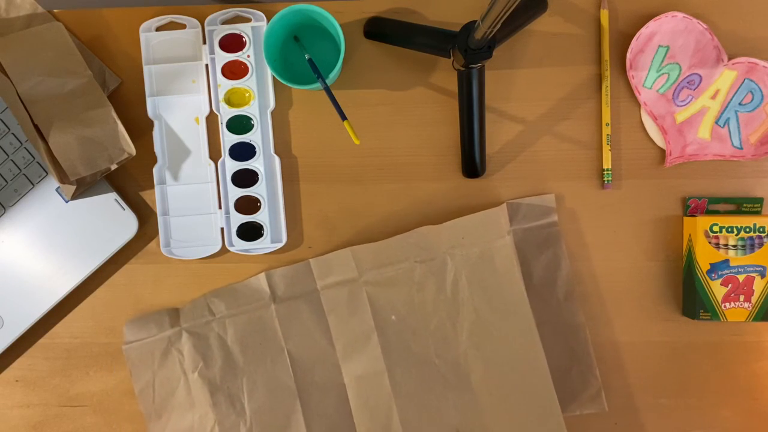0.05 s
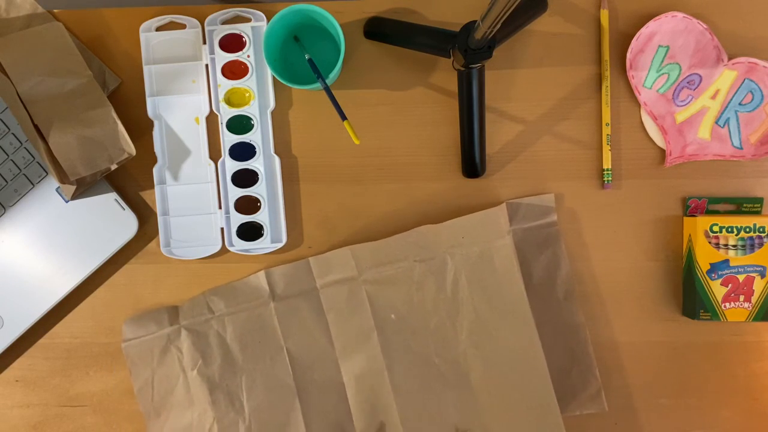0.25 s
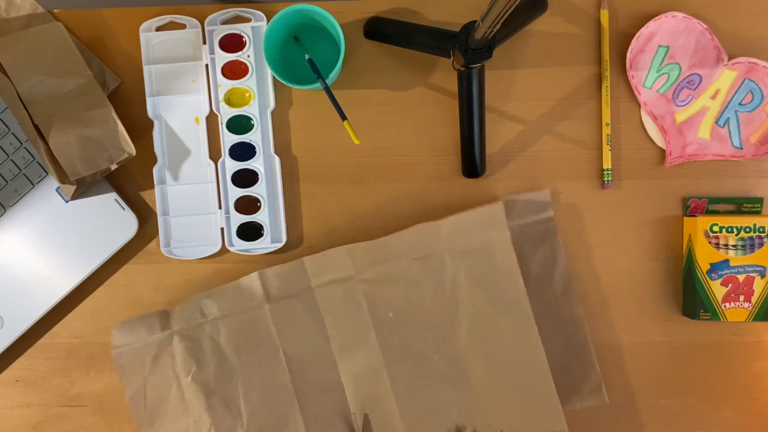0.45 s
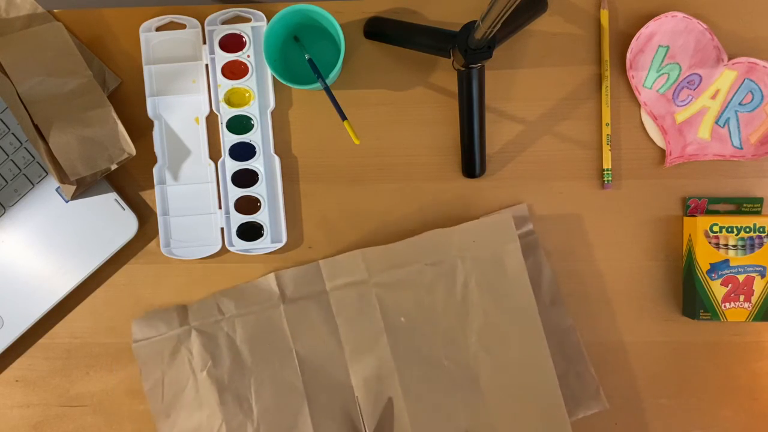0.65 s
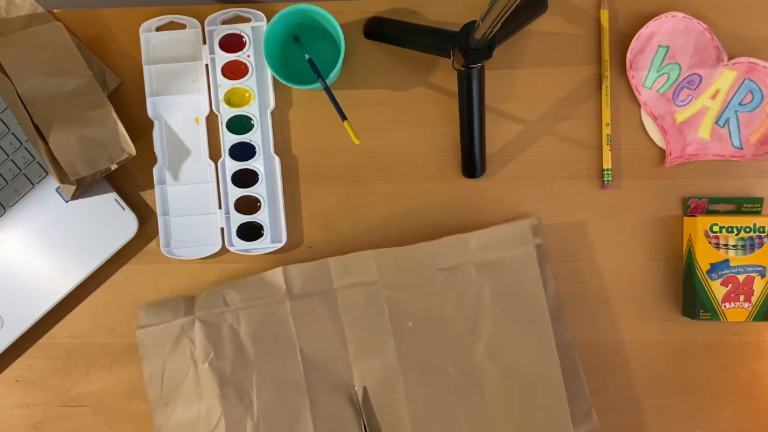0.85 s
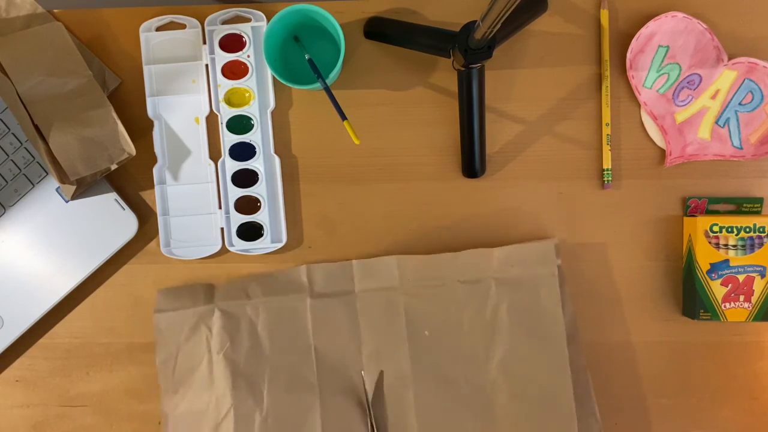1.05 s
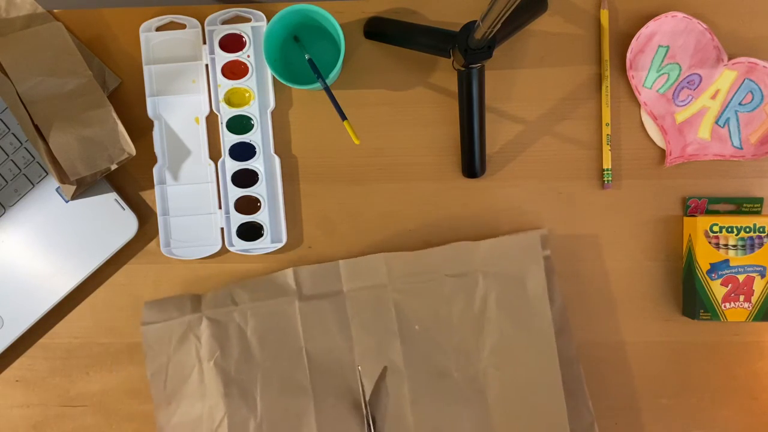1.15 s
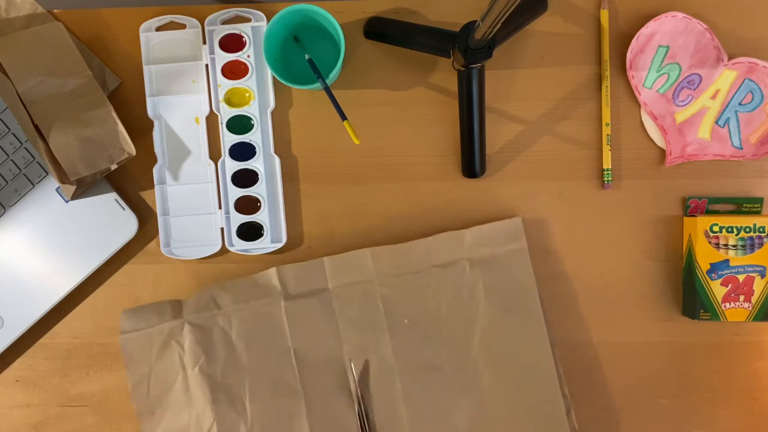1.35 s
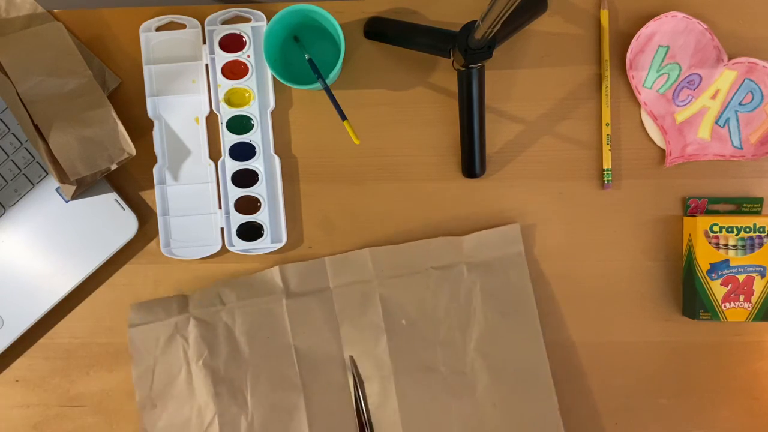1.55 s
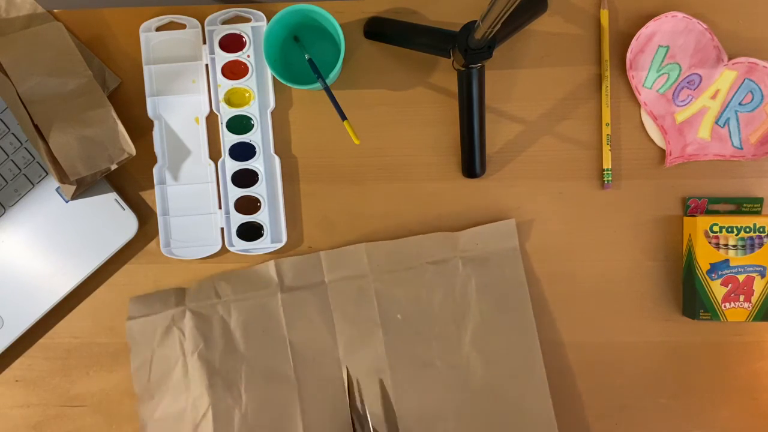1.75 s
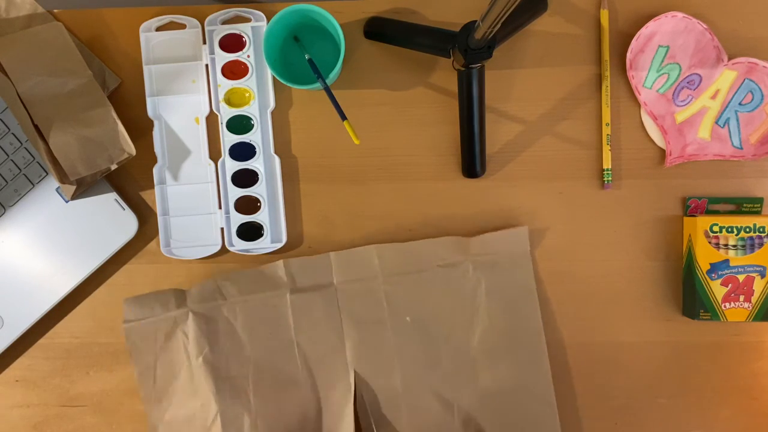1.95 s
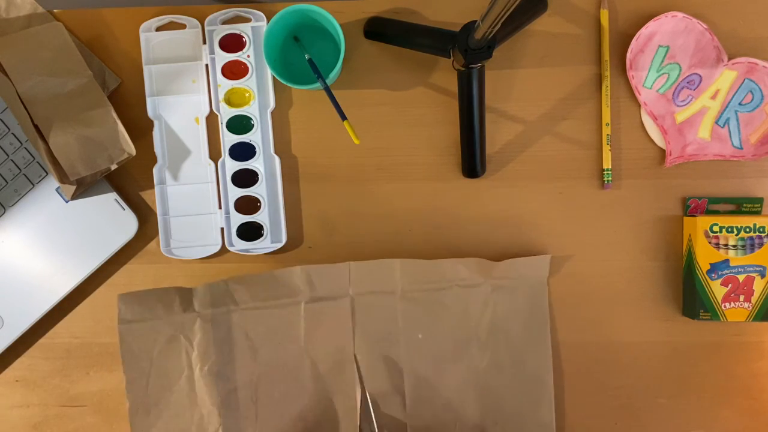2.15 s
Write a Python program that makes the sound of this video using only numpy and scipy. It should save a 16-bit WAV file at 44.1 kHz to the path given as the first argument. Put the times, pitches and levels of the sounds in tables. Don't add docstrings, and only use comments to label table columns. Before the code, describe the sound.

Scissors cutting a paper bag in several crunchy strokes, with crisp snaps, rustling and soft table thumps.

```python
import sys
import numpy as np
from scipy import signal
from scipy.fft import rfft, irfft, next_fast_len
from scipy.io import wavfile
from scipy.ndimage import map_coordinates

SR = 44100
rng = np.random.default_rng(int(sys.argv[2]) if len(sys.argv) > 2 else 0)


def persist_wave(psi):
    counts = np.round(np.clip(psi, -1, 1) * 32767).astype(np.int16)
    wavfile.write(sys.argv[1], SR, np.atleast_2d(counts).T)


def volts_from_db(level):
    exponent = np.asarray(level, float) / 20
    return 10 ** exponent


N = 97020
T = np.arange(N) / SR


def unit(x):
    return x / np.sqrt(np.mean(x ** 2) + 1e-20)


def along(points, hz):
    f, v = np.transpose(points)
    return np.interp(np.log(hz + 1), np.log(f + 1), v)


def curve(rows, axis):
    rows = np.array(rows)
    return np.interp(T, rows[:, 0], rows[:, axis])


def wobble(rate):
    knots = rng.standard_normal(int(N * rate / SR) + 4)
    return map_coordinates(knots, [T * rate])


def filtered(x, response):
    m = next_fast_len(N + SR // 2)
    hz = np.fft.rfftfreq(m, 1 / SR)
    return irfft(rfft(x, m) * response(hz), m)[..., :N]


# frequency_hz, level_db
HUM_SPECTRUM = [(22, -39), (56, 3), (80, -8.5), (130, -7), (180, -37.5)]
# time_s, level_db
HANDLING = [(0, -85.5), (.25, -72), (.44, -77), (.52, -57.5), (.67, -63.5), (.74, -67.5), (.95, -57),
            (1.16, -75), (1.4, -66.5), (1.57, -71), (1.62, -59.5), (1.8, -66), (1.88, -56.5), (2.0, -78),
            (2.2, -70.5)]


def hum():
    a, b = filtered(rng.standard_normal((2, N)), lambda hz: volts_from_db(along(HUM_SPECTRUM, hz)))
    pair = unit(np.array([a + 0.087 * b, a - 0.46 * b]))
    swell_db = curve(HANDLING, axis=1)
    level_db = -65 + 0.24 * (swell_db - swell_db.mean()) + 1.0 * wobble(12.0)
    hiss = volts_from_db(-92) * rng.standard_normal((2, N))
    return volts_from_db(level_db) * pair + hiss


# frequency_hz, level_db
RUMBLE_SPECTRUM = [(100, -30), (150, -5.5), (260, 0.5), (380, -0.5), (520, -5.5), (700, -14), (1000, -21.5)]
# start_s, level_db, pitch_hz
THUMPS = [(0.443, -48.5, 111), (1.613, -50, 278), (1.846, -35.5, 294), (1.875, -38, 516),
          (1.881, -37.5, 117), (1.95, -51.5, 111), (2.165, -39.5, 626), (1.858, -47, 200),
          (0.518, -47, 337), (0.658, -52, 305), (2.093, -43, 257)]


def table():
    rumble = unit(filtered(rng.standard_normal(N), lambda hz: volts_from_db(along(RUMBLE_SPECTRUM, hz))))
    out = rumble * volts_from_db(curve(HANDLING, axis=1) + 3.5 + 3.86 * wobble(29.81))
    for start_s, level_db, pitch_hz in THUMPS:
        t = np.maximum(T - start_s, 0)
        t60_s = 9 / pitch_hz
        onset = 1 - np.exp(-t / 0.00096)
        out = out + volts_from_db(level_db - 60 * t / t60_s) * onset * np.sin(2 * np.pi * pitch_hz * t)
    return out


def tearing(spiky_db, clump_db):
    size_db = spiky_db * rng.exponential(1, N) + clump_db * (wobble(400) + 0.18 * wobble(90))
    return unit(rng.standard_normal(N) * volts_from_db(size_db))


# time_s, level_db, brightness_db
SLIDE = [(0, -81, -13), (.1, -78, -12), (.115, -70, -3), (.42, -54.5, -13), (.72, -61.5, -3),
         (.9, -52, -10), (1.1, -52.5, -2), (1.21, -54, -4), (1.25, -65, -1), (1.56, -53, 3.5),
         (1.7, -50.5, -3), (1.82, -57, -4.5), (1.9, -48.5, -18), (1.97, -55, -1.5), (2.03, -51, 4.5),
         (2.12, -54.5, -3), (2.2, -57, 6)]
# frequency_hz, level_db
DRAG_SPECTRUM = [(180, -31), (680, -19), (950, 0), (1340, 4.5), (3190, -1), (7570, -6), (10600, -4.5),
                 (13800, -18), (16000, 2)]
# frequency_hz, level_db
GLIDE_SPECTRUM = [(3000, -41), (5000, -5), (7800, 3.5), (10000, -2), (13000, -1), (16000, -2.5)]


def slide():
    drag = filtered(tearing(spiky_db=2.0, clump_db=1.06), lambda hz: volts_from_db(along(DRAG_SPECTRUM, hz)))
    glide = filtered(tearing(spiky_db=1.5, clump_db=-0.2), lambda hz: volts_from_db(along(GLIDE_SPECTRUM, hz)))
    level_db = curve(SLIDE, axis=1)
    drag_db = level_db + 0.5 + 3.2 * wobble(25.44)
    glide_db = level_db + curve(SLIDE, axis=2) - 4.5 + 0.96 * wobble(7.5)
    return unit(drag) * volts_from_db(drag_db) + unit(glide) * volts_from_db(glide_db)


def hollow():
    start_s, level_db, pitch_hz, width_hz, t60_s = 1.6, -50.5, 770, 200, 0.76

    def cavity(f):
        return (1j * f * width_hz / (pitch_hz ** 2 - f * f + 1j * f * width_hz)) ** 2

    t = np.maximum(T - start_s, 0)
    ring = filtered(tearing(spiky_db=1.5, clump_db=4.0), cavity)
    return unit(ring) * volts_from_db(level_db - 60 * t / t60_s) * (1 - np.exp(-t / 0.0057))


# start_s, level_db, pitch_hz
POPS = [(0.879, -28.5, 1170), (0.885, -29.5, 1340), (1.213, -37, 1270), (1.2596, -27, 1120),
        (1.298, -29, 1225), (1.613, -31, 1220), (1.84, -21, 1217), (1.874, -25.5, 1290),
        (1.884, -34.5, 1000), (2.016, -54, 2000), (2.043, -45, 2510), (2.097, -37.5, 1860),
        (1.184, -49, 1520), (1.627, -34, 3300), (1.068, -40, 2820), (2.086, -29.5, 1262),
        (2.164, -40, 1120), (0.5655, -26, 2330), (0.667, -25, 2620), (0.7085, -30, 2050),
        (1.3075, -22, 5150), (1.354, -22, 3350), (1.442, -35, 2520), (1.491, -28, 1510), (1.944, -33, 4700),
        (0.516, -39.5, 1020)]


def pops():
    cycles, late_s, echo_s, echo_db = 1.34, .001, .008, -9.5
    out = np.zeros(N)
    for start_s, level_db, pitch_hz in POPS:
        for delay_s, loss_db in [(0, 0), (echo_s, echo_db)]:
            u = np.maximum(T - start_s - delay_s - late_s, 0) * pitch_hz / cycles
            out += volts_from_db(level_db + loss_db - 3) * u * np.exp(1 - u) * np.sin(2 * np.pi * u * cycles)
    return out


# frequency_hz, width_hz, level_db
SHEET = [(1035, 286, -2), (1530, 564, -3.5), (2210, 448, 0), (2570, 506, -0.5), (3285, 2200, -12)]


def sheet(f, part):
    rise = (1j * f / 700 / (1 + 1j * f / 700)) ** 6
    total = 0
    for k, (centre_hz, width_hz, level_db) in enumerate(part):
        damping = 1j * f * width_hz
        mode = damping / (centre_hz * centre_hz - f * f + damping + 1e-9)
        total = total + (-1) ** k * volts_from_db(level_db) * mode
    return rise * total


# frequency_hz, level_db
FIZZ_SPECTRUM = [(2500, -21.5), (3500, -0.5), (6000, -1.5), (8300, 2), (13500, -1.5), (15000, -3),
                 (16100, -1)]


def voiced(drive, low, body, fizz):
    colours = [lambda f: sheet(f, SHEET[:2]),
               lambda f: sheet(f, SHEET[2:]),
               lambda f: volts_from_db(along(FIZZ_SPECTRUM, f))]
    out = np.zeros(N)
    for envelope, colour in zip([low, body, fizz], colours):
        out += filtered(drive * envelope, colour) / np.std(filtered(drive, colour))
    return out


# start_s, peak_db, brightness_db, t60_s
SNAPS = [(0.019, -63, 7.5, 0.02), (0.15, -44, -4, 0.011), (0.1842, -31, -6, 0.007), (1.05, -35, -9, 0.01),
         (0.353, -31, -6, 0.0053), (0.587, -30, -18, 0.013), (0.599, -32, -8, 0.012),
         (0.6055, -31, -12, 0.0065), (0.6104, -24.5, -8, 0.0066), (0.617, -24, -9, 0.011),
         (0.648, -25, 0, 0.01), (0.712, -31, -7.5, 0.0067), (0.848, -22, -4, 0.0099),
         (0.93, -29, -0.5, 0.014), (1.0392, -34, -13, 0.012), (1.454, -34.5, 0.5, 0.0091),
         (1.464, -36, -4, 0.0069), (1.502, -32.5, -28, 0.008), (1.777, -38, -17, 0.028),
         (1.428, -26, -12, 0.011), (0.47, -30, -14, 0.015), (0.12, -43, -9.5, 0.019),
         (0.477, -30.5, -10, 0.013), (0.5165, -28, -12, 0.021), (0.564, -25, -9, 0.02),
         (0.652, -40, -2, 0.024), (0.667, -37, -22, 0.027), (0.7085, -19.5, -8, 0.0088),
         (0.745, -28, -4, 0.0061), (0.754, -17, -17, 0.009), (0.878, -28.5, -3.5, 0.029),
         (0.903, -22.5, -8.5, 0.017), (0.969, -24, -9.5, 0.014), (1.063, -31.5, -5.5, 0.022),
         (1.2605, -27, -18, 0.012), (1.307, -21, 6.5, 0.01), (1.3528, -23.5, -5.5, 0.018),
         (1.379, -26, -8, 0.018), (1.4228, -24.5, -23, 0.024), (1.443, -26, -16, 0.022),
         (1.489, -24, -59, 0.031), (1.536, -32, -7.5, 0.014), (1.599, -20.5, -15.5, 0.026),
         (1.622, -24.5, -37, 0.025), (1.661, -26, -10, 0.05), (1.746, -30, -30, 0.024),
         (1.84, -18, -11.5, 0.017), (1.905, -23.5, -48, 0.028), (1.943, -41, -3, 0.026),
         (2.087, -33.5, -27, 0.035)]


def snaps():
    body, fizz = np.zeros(N), np.zeros(N)
    for start_s, peak_db, bright_db, t60_s in SNAPS:
        t = np.maximum(T - start_s, 0)
        t60_s = max(t60_s, .004)
        onset = 1 - np.exp(-t / (0.065 * t60_s))
        rattle = 0.093 * volts_from_db(-60 * t / (4.4 * t60_s))
        shape = onset * (volts_from_db(-60 * t / t60_s) + rattle)
        body += volts_from_db(peak_db - 4.0) * shape
        fizz += volts_from_db(peak_db + bright_db + 0.5) * shape
    return voiced(tearing(spiky_db=0.46, clump_db=0.05), volts_from_db(-5.0) * body, volts_from_db(-1.5) * body, fizz)


# time_s, effort_db, low_ring_db, brightness_db
STROKES = [
    [(.11, -73.5, -4, -45), (.18, -47, -7, -5), (.255, -36, -8, -9), (.278, -34.5, -1.5, 0),
     (.355, -42, 0.5, -5.5), (.368, -63, 17, -12)],
    [(.458, -54, -10, -4), (.478, -40, 3.5, -3.5), (.497, -50.5, -1, -0.5), (.6, -36, -10.5, -11.5),
     (.657, -39.5, -18, -21.5), (.695, -56.5, -6, -25)],
    [(.753, -26, -21, -28), (.775, -30, -3.5, -6), (.825, -31, -3, -1.5), (.862, -38.5, 1, 3),
     (.875, -60, 0, -6)],
    [(.918, -44.5, 2, -10), (.972, -36, -3, -9), (.985, -50, 2.5, 1), (1.03, -41.5, -8.5, -6),
     (1.05, -37.5, -8, -19), (1.072, -48.5, -13, 1), (1.08, -55, 4, 2)],
    [(1.29, -45, 0, 6), (1.3, -35, -6, -2), (1.32, -41.5, -4.5, 1), (1.4, -50.5, 2.5, 9.5),
     (1.46, -51.5, -1.5, -9), (1.475, -63, -8, -6)],
]


def shearing():
    low, body, fizz = np.zeros((3, N))
    for rows in STROKES:
        inside_s = np.minimum(T - rows[0][0], rows[-1][0] - T)
        push = np.clip(inside_s / 0.0033, 0, 1) * volts_from_db(curve(rows, axis=1))
        body += push
        low += push * volts_from_db(curve(rows, axis=2))
        fizz += push * volts_from_db(curve(rows, axis=3) - 0.5)
    return voiced(tearing(spiky_db=2.4, clump_db=1.1), low, body, fizz)


def scatter(x):
    z = signal.stft(x, nperseg=128)[2]
    hold = 9
    field = rng.standard_normal((2, 2, z.shape[0], z.shape[1] // hold + 1))
    field = field.repeat(hold, axis=3)[..., :z.shape[1]]
    return signal.istft(z * (field[0] + 1j * field[1]), nperseg=128)[1][:, :N]


# frequency_hz, t60_s
ROOM_DECAY = [(200, 0.26), (12000, 0.04)]


def room(x):
    hz, t, z = signal.stft(rng.standard_normal((2, SR // 3)), SR, nperseg=128)
    decay = volts_from_db(-60 * t / along(ROOM_DECAY, hz)[:, None])
    ir = signal.istft(z * decay, SR, nperseg=128)[1]
    delayed = np.pad(x, (300, 0))[None]
    return signal.fftconvolve(delayed, ir / np.linalg.norm(ir[0]), axes=1)[:, :N]


def scene():
    paper = shearing() + snaps() + pops() + hollow() + slide() + table()
    return paper + volts_from_db(-7) * scatter(paper) + volts_from_db(-13) * room(paper) + hum()


# frequency_hz, left_lead_rad
PORT_PHASE = [(0, 0), (2400, -1.2), (4900, -3), (6200, -2.2), (7900, 0), (13050, 2 * np.pi),
              (15100, 3 * np.pi)]
# frequency_hz, left_minus_right_db
PORT_TILT = [(300, 0), (1000, -3.5), (2200, 0), (4200, -3.5), (6800, -3.2), (7800, 0)]
# frequency_hz, level_db
PORT_SPREAD = [(500, 0.5), (1200, -2), (2500, 1), (3500, 6), (6000, 6), (7200, -1.5), (16000, -2.5)]


def ports(pair):
    mono_hz, top_hz = 6800, 16000
    steps = .2
    f, v = np.transpose(PORT_PHASE)

    def half(hz):
        phase = np.interp(hz, f, v)
        turn = phase - steps * (hz > mono_hz) * np.sin(2 * phase)
        return np.exp(.5j * turn) * volts_from_db(along(PORT_TILT, hz) / 2)

    mid = (pair[0] + pair[1]) / 2
    side = filtered((pair[0] - pair[1]) / 2, lambda hz: volts_from_db(along(PORT_SPREAD, hz)))
    return filtered(np.array([mid + side, mid - side]),
                    lambda hz: np.array([half(hz), 1 / half(hz)]) * (hz < top_hz))


def top_cut(x):
    return signal.sosfilt(signal.butter(12, 16370, fs=SR, output="sos"), x)


def record(dry):
    mix = ports(dry)
    return top_cut(mix)


dry = scene()
out = record(dry)
persist_wave(out)
```